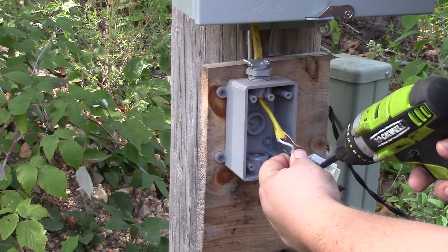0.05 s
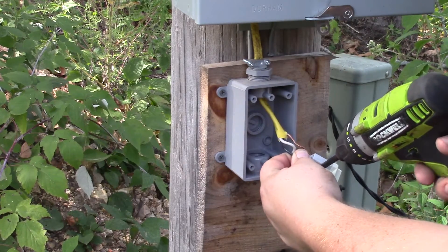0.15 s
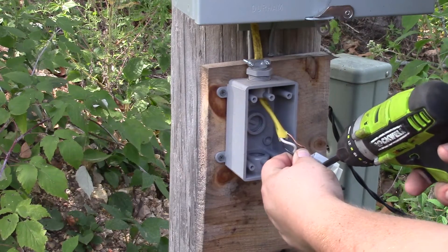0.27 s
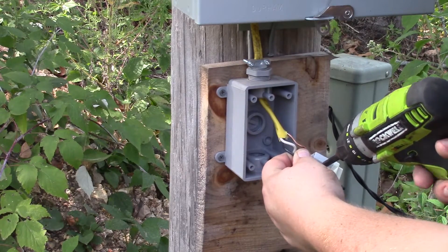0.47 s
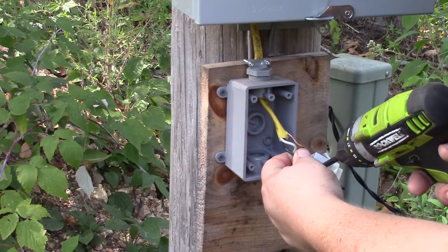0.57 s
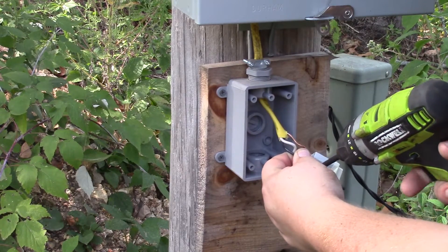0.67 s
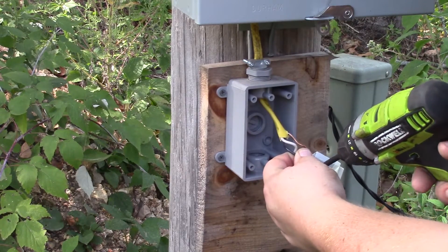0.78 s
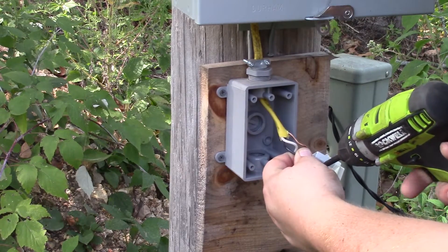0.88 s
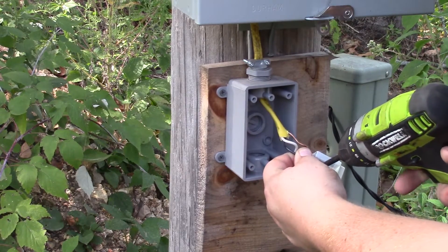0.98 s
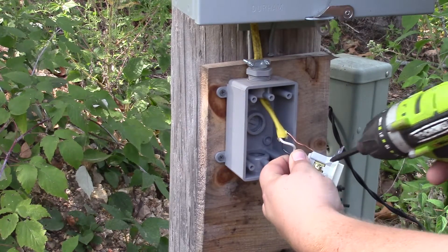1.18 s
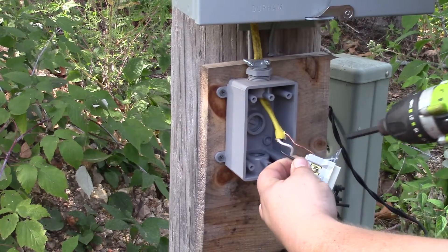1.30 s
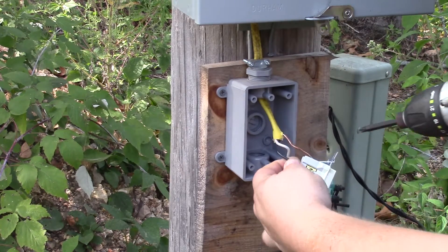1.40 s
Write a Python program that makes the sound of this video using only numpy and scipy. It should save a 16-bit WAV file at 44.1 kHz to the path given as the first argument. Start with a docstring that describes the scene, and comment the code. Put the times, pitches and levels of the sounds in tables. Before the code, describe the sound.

Three quick, loud bursts of a cordless drill with a rattling, slipping clutch outdoors.

```python
"""Insects hiss among trees, something drones far off, and parts tick faintly in a hand by the microphone.
Then, close by, a cordless drill tightens a terminal screw in three short trigger pulls.
Each time the motor winds up, the gears rattle and the clutch slips about 44 times a second,
snapping into the housing. The noise dies away across the yard."""
import sys
import numpy as np
from scipy import signal
from scipy.fft import rfft, irfft, next_fast_len
from scipy.io import wavfile

SR = 44100
rng = np.random.default_rng(int(sys.argv[2]) if len(sys.argv) > 2 else 0)


def unload_wav(signal):
    """Save mono or channel-first audio to the path in sys.argv[1] as 16-bit WAV at rate SR, clipped to [-1, 1]."""
    wavfile.write(
        sys.argv[1],
        SR,
        np.round(np.clip(np.atleast_2d(signal).T, -1, 1) * 32767).astype(np.int16),
    )


N = 63945
T = np.arange(N) / SR


def from_db(db):
    """Decibels to gain."""
    return 10 ** (np.asarray(db) / 20)


def rms_one(x):
    """Scale to rms 1."""
    return x / np.sqrt(np.mean(x ** 2) + 1e-20)


def curve(rows):
    """Gain over time from (s, dB) points."""
    s, db = np.transpose(rows)
    return from_db(np.interp(T, s, db))


def drift(rate_hz):
    """Random wander of rms 1, mostly slower than rate_hz."""
    hz = np.arange(N + 1) * SR / (2 * N)
    spectrum = rfft(rng.standard_normal(2 * N)) / (1 + (hz / rate_hz) ** 2)
    return rms_one(irfft(spectrum)[:N])


def butter(x, order, hz, kind):
    """Butterworth filter."""
    return signal.sosfilt(signal.butter(order, hz, kind, fs=SR, output="sos"), x)


def colour(x, points):
    """Causal filter of unit power gain that follows (Hz, dB) points."""
    size = 2 * next_fast_len(len(x))
    hz, db = np.transpose(points)
    bin_hz = np.arange(size // 2 + 1) * SR / size
    gain = rms_one(from_db(np.interp(np.log(bin_hz + 1), np.log(hz), db)))
    cepstrum = irfft(np.log(gain))
    cepstrum[1:size // 2] *= 2   # fold to minimum phase
    cepstrum[size // 2 + 1:] = 0
    return irfft(rfft(x, size) * np.exp(rfft(cepstrum)))[:len(x)]


def dying_noise(t60, size=N):
    """Noise that falls 60 dB in t60 seconds."""
    return rng.standard_normal(size) * np.exp(-np.log(1000) * T[:size] / t60)


# Open air all round the microphone. Each row: frequency in Hz, relative level in dB.
AIR_COLOUR = [(30, -24), (70, -43), (140, -4), (230, 2.5), (450, 0), (750, -4.5), (1200, 0.5), (1800, -8),
              (2700, -4), (4200, -11.5), (6500, -16.5), (10000, -24), (15000, -28.5)]
# Background level, ducking after the loud drill bursts as with a recorder's gain control.
# Each row: time in seconds, level in dB.
AIR_LEVEL = [(0, -49), (.1, -54), (.2, -55), (.55, -54.5), (.85, -54.5), (1.15, -60.5), (1.3, -61.5),
             (1.45, -59.5)]
# Hums far off. Each row: pitch in Hz, peak time in seconds, level in dB,
# seconds to fall by 9 dB (sign ignored).
DRONES = [(237, .78, -44, .11), (281, 0.31, -57, .3), (243, 0.042, -51, .04), (410, 0.32, -48, 0.15),
          (172, 1.04, -55, .12), (240.7, 1.08, -52, 0.05), (356, 1.05, -54, -0.05)]


def air_and_drones():
    """Outdoor air, with wavering low hums that swell and fade."""
    out = curve(AIR_LEVEL) * colour(rng.standard_normal(N), AIR_COLOUR)
    for hz, peak_s, db, width_s in DRONES:
        swell = from_db(db + 2 * drift(20)) * np.exp(-((T - peak_s) / width_s) ** 2)
        out += swell * np.sin(2 * np.pi * hz * T + .6 * drift(11))
    return out


# Insects in the background. Each row: frequency in Hz, relative level in dB.
INSECT_COLOUR = [(5000, -52.5), (6600, -18.5), (7200, 2), (8050, 2), (8450, 4), (8900, -17.5), (11000, -45)]
# Their level, ducking as with a recorder's gain control. Each row: time in seconds, level in dB.
INSECT_LEVEL = [(0, -61), (.22, -57), (.4, -64), (.9, -66), (1.2, -65), (1.45, -64.5)]


def insects(throb_hz=53, cricket_hz=5600, chirps_per_s=13.5):
    """A throbbing chorus near 8 kHz and one thin cricket."""
    throb = 1 + .2 * np.sin(2 * np.pi * throb_hz * T + drift(5))
    chorus = curve(INSECT_LEVEL) * throb * colour(rng.standard_normal(N), INSECT_COLOUR)
    chirps = np.sin(np.pi * chirps_per_s * T + drift(3)) ** 2
    cricket = from_db(-70) * chirps * np.sin(2 * np.pi * cricket_hz * T + drift(30))
    return chorus + cricket


def contacts(rows, chatter_s, points, shell_db=-4, shell_t60=.037, shell_top_hz=5040):
    """Each (s, dB) is a brief flurry of contacts with the duller ring of the plastic shell."""
    size = 4096
    chatter = np.exp(-T[:size] / chatter_s) * (T[:size] < 2 * chatter_s)
    out = np.zeros(2 * N)
    for s, db in rows:
        flurry = colour(rng.choice([-1, 1], size) * chatter, points)
        ring = colour(butter(dying_noise(shell_t60, size), 1, shell_top_hz, "low"), points)
        hit = flurry / np.linalg.norm(flurry) + from_db(shell_db) * ring / np.linalg.norm(ring)
        start = int(s * SR)
        out[start:start + size] += from_db(db) * hit
    return out[:N]


# Parts in the hand, by the microphone.
# Each row: start in seconds, relative level in dB, brightest frequency in Hz.
TICKS = [(.016, -35.5, 7000), (0.0951, -33, 6960), (0.1498, -29, 4460), (0.169, -48, 4000),
         (.2143, -26.5, 7000), (.483, -30.5, 7000), (.522, -35.5, 6000), (.5925, -29, 7000),
         (.794, -33.5, 5900), (.827, -41, 7000), (.849, -31.5, 6000), (1.093, -41, 6840),
         (1.1368, -36, 5500), (1.214, -46.5, 5000), (1.313, -48, 5990), (1.346, -40, 3040),
         (1.368, -45.5, 5050), (1.394, -38, 2720)]


def ticks():
    """Light touches of trigger, bit and wire, each with its own brightness."""
    out = 0
    for s, db, hz in TICKS:
        hump = [(hz / 10, -20), (hz / 3, -10), (hz, 0), (3 * hz, -20)]
        out += contacts([(s, db)], chatter_s=.0018, points=hump)
    return from_db(6.5) * butter(out, 3, 11000, "low")


# The motor's effort, one list per trigger pull. Each row: time in seconds, relative level in dB.
PULLS = [
    [(.209, -60), (.214, -16.5), (.234, -17.5), (.241, -3), (.27, 3), (.389, -0.5), (.402, -7.5),
     (.409, -30), (.45, -27)],
    [(.589, -51.5), (.596, -25), (.611, -16), (.621, 0), (.68, 0.5), (.727, -2), (.737, -13.5),
     (.748, -34.5), (.78, -33)],
    [(.909, -31.5), (.914, -17), (.933, -19.5), (.944, 0.5), (.984, 0), (1.003, -7), (1.023, -13.5),
     (1.034, -37.5), (1.07, -34)],
]
# The gearbox from close by. Each row: frequency in Hz, relative level in dB.
GEAR_COLOUR = [(40, -40), (150, -22), (280, -4.5), (550, -4), (800, -0.5), (1000, -1.5), (1500, 2),
               (2100, -2), (2800, 3.5), (3900, -2), (4700, -6.5), (7300, -9.5), (9800, -8.5), (13000, -18),
               (14200, -20.5), (16000, -37.5)]


def gears(teeth_per_s=6000, spread_db=1.5, flutter_db=2):
    """Dense, uneven tooth impacts follow the motor's effort."""
    effort = sum(curve(pull) * (T > pull[0][0]) * (T < pull[-1][0]) for pull in PULLS)
    teeth = (rng.random(N) < teeth_per_s / SR) * rng.choice([-1, 1], N)
    force = from_db(spread_db * np.minimum(rng.exponential(1, N), 4))
    rattle = colour(teeth * force, GEAR_COLOUR) * from_db(flutter_db * drift(200))
    return from_db(-22) * effort * rms_one(rattle)


# Thin tones from the drill. Each row: start in seconds, length in seconds, pitch in Hz, level in dB.
WHINES = [(.212, .026, 7900, -50), (.212, .026, 13000, -55), (.59, .026, 13050, -54),
          (.725, 0.04, 12940, -55), (.912, .026, 12900, -52), (1.0, 0.053, 13000, -49)]


def whine(wobble_rad=.8):
    """The speed control whines unsteadily while the trigger is half way."""
    out = 0
    for s, length, hz, db in WHINES:
        swell = from_db(db) * np.sin(np.pi * np.clip((T - s) / length, 0, 1))
        out += swell * np.sin(2 * np.pi * hz * T + wobble_rad * drift(150))
    return out


# Resonances of the drill's body. Each row: frequency in Hz, relative level in dB, t60 in seconds.
HOUSING_MODES = [(1605, -40, .05), (2010, -44, .06), (2163, -46, .09), (2600, -39, .04), (2740, -41, .055),
                 (2965, -47, .06), (3210, -47, .07), (3870, -44, .05), (4000, -41, .045), (5510, -47, .06),
                 (6540, -49, .11), (9385, -47, .13), (13000, -46, .14)]


def housing(x, bass_cut_hz=150):
    """Impacts ring housing, chuck and bit; the small body radiates little bass."""
    response = 0
    for hz, db, t60 in HOUSING_MODES:
        decay = np.exp(-np.log(1000) * T / t60)
        response += from_db(db - .5) * decay * np.cos(2 * np.pi * hz * T) / 2
    ring = signal.fftconvolve(x, response)[:N]
    return butter(x + ring, 2, bass_cut_hz, "high")


# The clutch, close to the microphone. Each row: start in seconds, relative level in dB,
# rebound delay in seconds, rebound level in dB against the snap.
SNAPS = [(0.2362, -1.5, 0.0023, -10), (0.2537, -2.5, 0.0034, 4.5), (0.2641, 1.5, 0.0078, -1.5),
         (0.2882, 2.5, 0.0072, -7), (.3116, 2.5, 0.008, -9), (.3340, 3, 0.0061, -10),
         (0.3565, -0.5, .0075, -4), (0.3795, 1.5, .0085, -9), (0.3914, -10, .006, 2.5),
         (0.618, -8.5, 0.0032, 2.5), (0.6291, -0.5, 0.0058, -6), (.6522, 1, 0.0064, -1.5),
         (0.6752, 1, 0.0064, -9.5), (0.6959, 1.5, 0.0099, -10.5), (.7270, -3, 0.0014, -16.5),
         (0.9406, -4, 0.004, 1.5), (0.9518, -2.5, 0.0075, -2.5), (0.9772, 1.5, 0.0097, -8),
         (0.9936, -5, 0.0058, -5), (1.0201, -14, 0.0095, -12.5)]
# Duller knocks around the snaps. Each row: start in seconds, relative level in dB.
KNOCKS = [(.2510, -1), (.3055, -0.5), (.3288, -2.5), (.3508, 1), (.3722, -1), (.5988, -18.5), (.6152, -3),
          (.6455, -5.5), (.6686, 1), (.7225, -6.5), (.9132, -16.5), (.9205, -16), (.9367, -7),
          (.9688, -12.5), (1.0085, -29.5)]
# The tone of a snap and of a knock. Each row: frequency in Hz, relative level in dB.
SNAP_COLOUR = [(40, -44.5), (150, -30), (300, -14.5), (650, -9.5), (1000, -8), (1500, -3), (2200, -3),
               (3000, 0.5), (4000, 1.5), (4700, -4.5), (5700, -3), (7300, -9), (9500, -6.5), (11300, -12.5),
               (13000, -11.5), (14200, -23), (16000, -29.5)]
KNOCK_COLOUR = [(60, -34), (300, -10), (650, 2.5), (1000, -2), (1600, 4.5), (2700, -1), (4500, -8.5),
                (7000, -16), (10000, -16.5), (13000, -19.5), (16000, -34.5)]


def clutch():
    """The clutch jumps detents and rebounds; the drive train knocks as it takes up its play."""
    jumps = [row[:2] for row in SNAPS]
    rebounds = [(s + delay, db + rebound_db) for s, db, delay, rebound_db in SNAPS]
    snaps = contacts(jumps + rebounds, chatter_s=.0016, points=SNAP_COLOUR)
    knocks = contacts(KNOCKS, chatter_s=.00088, points=KNOCK_COLOUR)
    return from_db(8.5) * snaps + from_db(4.5) * knocks


# Overload thumps. Each row: start in seconds, relative level in dB.
THUMPS = [(.255, -6.5), (.312, 2), (.334, -0.5), (.356, -1), (0.619, -13.5), (.653, -9.5), (0.694, -17),
          (.978, -20)]


def overload_thumps(decay_s=.0011, band_hz=(25, 220)):
    """Low thumps on the loudest snaps, as from an overloaded recorder."""
    pulses = sum(from_db(db) * (T >= s) * np.exp(-np.abs(T - s) / decay_s) for s, db in THUMPS)
    return 2 * from_db(-36.5) * butter(pulses, 2, band_hz, "band")


# The yard as it answers at the microphone. Each row: frequency in Hz, level in dB, t60 in seconds.
YARD_REVERB = [(100, -16, .5), (170, -4, 0.71), (260, 0, 0.71), (400, -14, 0.5), (800, -18.5, 0.35),
               (2500, -33.5, 0.51), (6000, -20.5, .32), (12000, -24.5, .25)]


def yard(x, build_s=.008):
    """Scatter from trees and walls; the lows linger longest."""
    hz, db, t60 = np.transpose(YARD_REVERB)
    edges = np.geomspace(70, 16000, 13)
    response = 0
    for low, high in zip(edges, edges[1:]):
        log_centre = np.log(low * high) / 2
        tail = dying_noise(np.interp(log_centre, np.log(hz), t60)) * (1 - np.exp(-T / build_s))
        band = butter(tail, 3, [low, high], "band")
        gain = from_db(np.interp(log_centre, np.log(hz), db)) * np.sqrt(2 * (high - low) / SR)
        response += gain * band / np.linalg.norm(band)
    return signal.fftconvolve(x, response)[:N]


def scene():
    """One microphone: the drill close up, the yard around it, insects and drones behind."""
    near = housing(clutch() + gears()) + whine() + overload_thumps() + ticks()
    return (near + yard(near) + insects() + air_and_drones())[None]


def record(dry, ceiling=.84, cutoff_hz=15900):
    """The recorder flattens only the highest peaks and cuts the top of the treble."""
    held = dry / (1 + (dry / ceiling) ** 12) ** (1 / 12)
    return signal.sosfilt(signal.ellip(12, .1, 100, cutoff_hz, fs=SR, output="sos"), held)


dry = scene()
out = record(dry)
unload_wav(out)
```